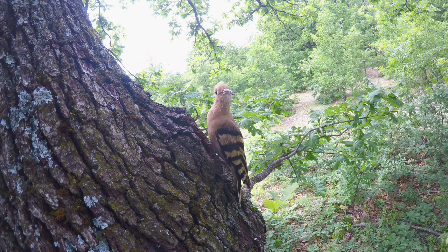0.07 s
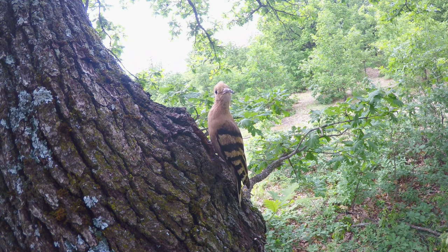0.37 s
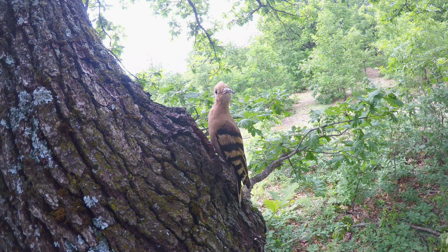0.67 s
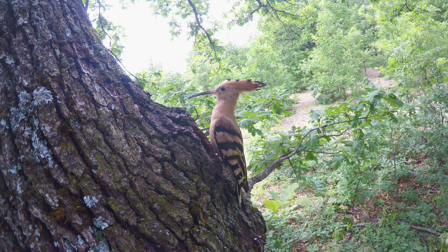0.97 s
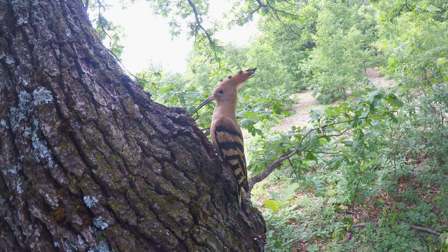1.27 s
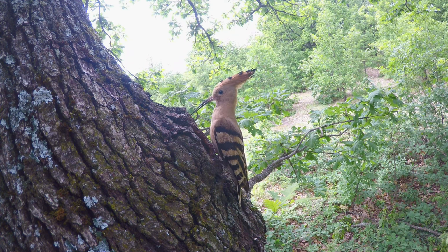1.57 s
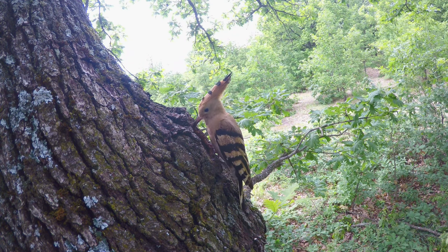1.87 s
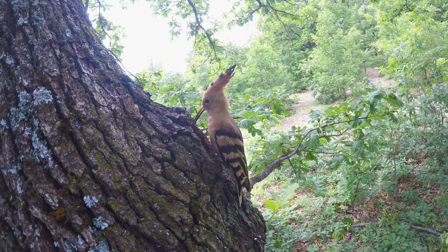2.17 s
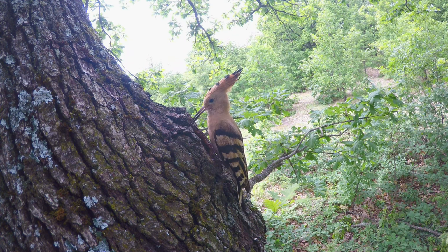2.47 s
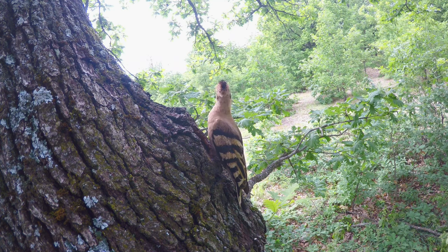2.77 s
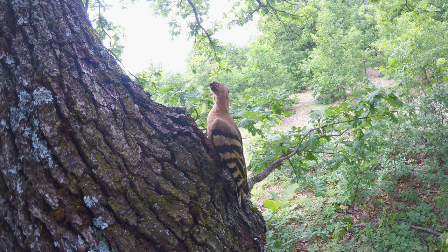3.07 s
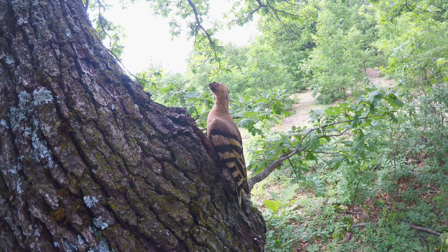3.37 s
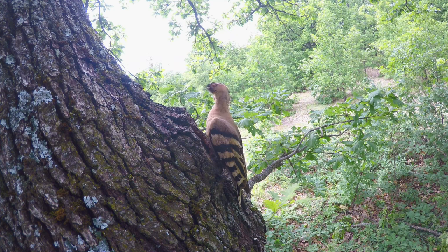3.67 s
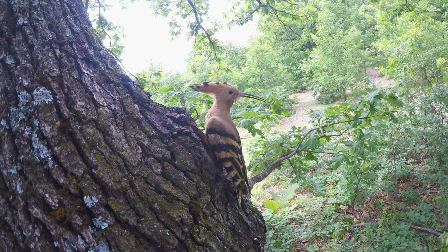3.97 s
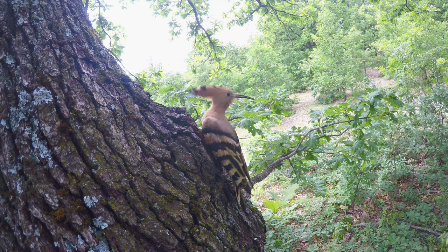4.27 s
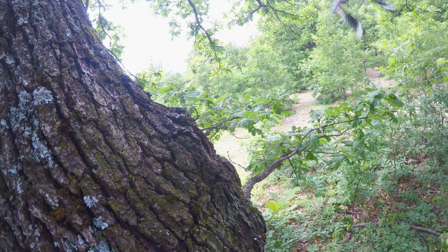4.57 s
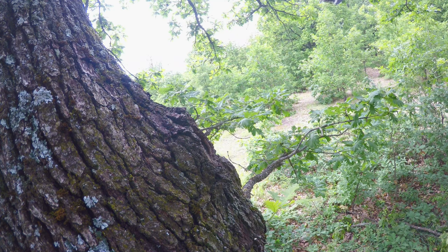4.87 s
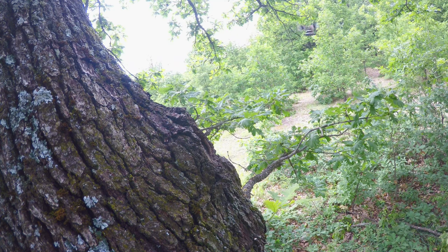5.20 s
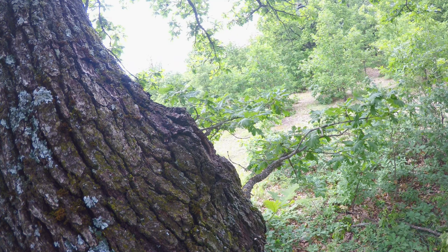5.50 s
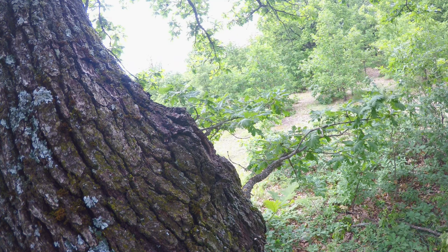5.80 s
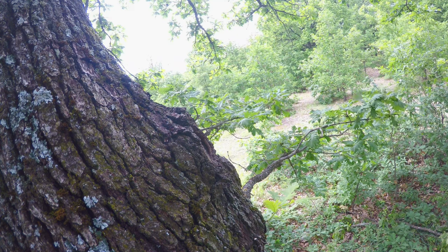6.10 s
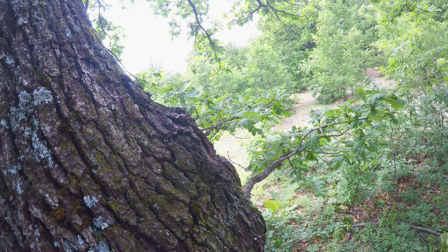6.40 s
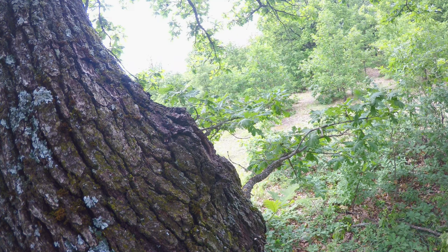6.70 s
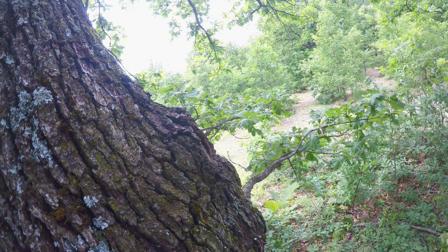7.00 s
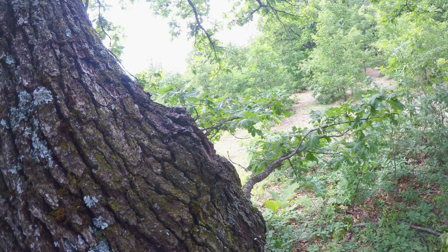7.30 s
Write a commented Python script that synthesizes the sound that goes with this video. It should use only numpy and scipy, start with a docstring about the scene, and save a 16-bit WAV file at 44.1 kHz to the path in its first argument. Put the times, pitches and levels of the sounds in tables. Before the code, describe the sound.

A brood of baby birds trills, peeps and hisses without pause inside a hollow tree, thin and shrill, near the microphone. Over them an adult hoopoe rasps harshly at the start and twice more, then leaves with a light scrape on bark and a short flutter. The chicks carry on alone, with a thin woodland echo and faint steady background noise underneath.

```python
"""A hoopoe at its nest hole in an old tree in a wood. From the start, over faint background noise, the
nestlings beg: very high, fast-wavering whistles over a hiss of air forced through small throats.
The adult rasps until 0.7 s, then from 2.0 s and 3.9 s: its syrinx slaps puffs of noise through throat
and bill. Near 4.4 s it flutters off, scuffing the bark, and a low draught swells.
The brood begs on to the end."""
import sys
import numpy as np
from scipy import signal
from scipy.fft import rfft, irfft
from scipy.io import wavfile

SR = 44100
rng = np.random.default_rng(int(sys.argv[2]) if len(sys.argv) > 2 else 0)


def int16_out(signal):
    """Quantize to a 16-bit WAV file."""
    q = np.round(np.clip(np.atleast_2d(signal).T, -1, 1) * 32767)
    wavfile.write(sys.argv[1], SR, q.astype(np.int16))


N = 328545
TIME = np.arange(N) / SR
FREQS = np.maximum(np.fft.rfftfreq(N, 1 / SR), 1)
SIDES = np.array([[1], [-1]])   # left, right


def from_db(db):
    """Decibels to gain."""
    return 10 ** (np.asarray(db) / 20)


def unit_rms(x):
    """Scale to rms 1."""
    return x / np.sqrt(np.mean(x ** 2) + 1e-20)


def in_time(rows):
    """Columns of a time table at every sample."""
    times, *columns = np.transpose(rows)
    return [np.interp(TIME, times, c) for c in columns]


def at_hz(rows, hz):
    """Columns of a frequency table at hz."""
    f, *columns = np.transpose(rows)
    return [np.interp(np.log(hz), np.log(f), c) for c in columns]


def drift(rate_hz):
    """Smooth random wander, rms 1."""
    return unit_rms(irfft(rfft(rng.standard_normal(N)) / (1 + (FREQS / rate_hz) ** 2), N))


def colour(x, spectrum, skirt_db_per_oct=70):
    """Shape by a spectrum with steep skirts; rms 1."""
    octaves_out = np.abs(np.log2(FREQS / np.clip(FREQS, spectrum[0][0], spectrum[-1][0])))
    gain = from_db(at_hz(spectrum, FREQS)[0] - skirt_db_per_oct * octaves_out)
    return unit_rms(irfft(rfft(x) * gain, N))


def noise(spectrum):
    """Two independent coloured noises."""
    return colour(rng.standard_normal((2, N)), spectrum)


def place(pair, image):
    """Mix a direct and a scattered signal to stereo with level and phase differences."""
    balance_db, lead_rad, coherence = at_hz(image, FREQS)
    coherence = np.clip(coherence, 0, 1)
    direct, scattered = rfft(pair)
    gain = from_db(SIDES * balance_db / 2)
    gain = gain / np.sqrt(np.sum(gain ** 2, axis=0)) * np.exp(.5j * SIDES * lead_rad)
    return irfft(gain * (np.sqrt(1 + coherence) * direct + SIDES * np.sqrt(1 - coherence) * scattered), N)


def scatter(x, t60_s):
    """Dense decaying reflections of unit energy."""
    t = TIME[:int(t60_s * SR) + 2]
    tail = rng.standard_normal(len(t)) * from_db(-60 * t / t60_s)
    return signal.fftconvolve(x, tail / np.linalg.norm(tail))[:N]


def fade(t, fade_s):
    """Linear fade in and out."""
    return np.clip(np.minimum(t - t[0], t[-1] - t) / fade_s, 0, 1)


def bump(centre_s, width_s):
    """Gaussian envelope, peak 1."""
    return np.exp(-.5 * ((TIME - centre_s) / width_s) ** 2)


# Steady background noise: f/Hz, level/dB
FLOOR_SPECTRUM = [(70, -24), (110, -19), (140, -2), (165, 2), (200, -2), (300, -3.5), (420, -7.5),
                  (600, -8), (850, -10), (1200, -13.5), (2200, -17), (3200, -21), (4400, -24)]
# Its stereo image, microphone hiss out of phase at about 500-2000 Hz:
# f/Hz, left-right/dB, left lead/rad, coherence/0-1
FLOOR_IMAGE = [(100, 0, 0, .6), (200, -1, 0, .25), (350, 0, 3.1, .15), (850, 0, 3.1, .88),
               (1500, 0, 3.1, .5), (2300, 0, 1.5, .2), (3000, 0, 0, .55), (3800, 0, 0, .95)]
# Draught envelope: t/s, level/dB
DRAUGHT_LEVEL = [(0, -74), (4.1, -74), (4.55, -60), (5.2, -60), (5.8, -66), (7.45, -72)]
# Draught rumble: f/Hz, level/dB
DRAUGHT_SPECTRUM = [(15, -18), (32, 7), (55, 1), (90, -9), (160, -31), (300, -40)]
# Leaf hiss: f/Hz, level/dB
LEAF_SPECTRUM = [(3500, -67), (4800, 6), (7000, 3), (10000, 0), (15000, -15)]
def background(floor_db=-47.5, leaves_db=-58, wander_db=.8, wander_hz=7,
               gust_db=2.0, gust_hz=7.1, width=0.31):
    """Faint steady noise with microphone hiss, slow air stirring close by and faint leaf hiss."""
    wander = from_db(wander_db * np.array([drift(wander_hz), drift(wander_hz)]))
    floor = from_db(floor_db) * place(noise(FLOOR_SPECTRUM) * wander, FLOOR_IMAGE)
    air, air_side = noise(DRAUGHT_SPECTRUM)
    draught_db = in_time(DRAUGHT_LEVEL)[0] + gust_db * drift(gust_hz)
    draught = from_db(draught_db) * (air + width * SIDES * air_side)
    return floor + draught + from_db(leaves_db) * noise(LEAF_SPECTRUM)


# Adult calls: start t/s, slackening t/s, end t/s, level/dB, brightness/dB, sag/(dB/s), pulse rate/Hz,
# relative rate spread at start, at end
RASP_CALLS = [(-0.3, 0.24, 0.70, -36.5, 3, 25, 142, .07, .12),
              (2.025, 2.48, 3.18, -35.5, 0, 18, 160, .19, .03),
              (3.88, 4.12, 4.425, -37, 3.5, 20, 167, .14, .14)]
def rasp_effort(opening_db=7, opening_s=.05, closing_db=11, closing_s=.023, attack_s=.03, release_s=.045,
                level_share=0.057, rate_share=0.081, shake_db=0.5, falter_db=4.5, slowest_hz=122):
    """Effort builds, holds and slackens in each rasp; gain, brightness and pulse rate follow."""
    gain, bright_db, pulse_hz, spread = np.zeros((4, N))
    unsteady_db = shake_db * drift(20) - falter_db * bump(2.8, .026)   # the long rasp falters once
    for start, slack, end, db, peak_bright_db, sag, rate_hz, spread0, spread1 in RASP_CALLS:
        at = (TIME >= start) & (TIME < end)
        t = TIME[at]
        effort_db = unsteady_db[at] - opening_db * np.exp((start - t) / opening_s)
        effort_db -= sag * np.maximum(t - slack, 0)
        effort_db -= closing_db * np.exp((t - end) / closing_s)
        gate = np.minimum(1, np.minimum((t - start) / attack_s, (end - t) / release_s))
        gain[at] = from_db(db + level_share * effort_db) * gate
        bright_db[at] = peak_bright_db + effort_db
        pulse_hz[at] = rate_hz * from_db(rate_share * effort_db)
        spread[at] = np.interp(t, [start, end], [spread0, spread1])
    return gain, bright_db, np.maximum(pulse_hz, slowest_hz), spread


# Bill resonance: t/s, f/Hz, boost/dB
BILL_RESONANCE = [(.26, 1820, 6.5), (.34, 1980, -3.5), (.55, 2300, 8.5), (2.05, 2180, 2.5),
                  (2.28, 1940, 11.5), (2.55, 2090, 7.5), (2.9, 2440, 12.5), (3.88, 2030, 0),
                  (4.03, 1800, 6), (4.32, 2200, 2.5)]
def bill(x, width_hz=300):
    """The open bill's resonance, rising as it narrows."""
    hz, boost_db = in_time(BILL_RESONANCE)
    carrier = np.exp(2j * np.pi * np.cumsum(hz) / SR)
    pole = np.exp(-np.pi * width_hz / SR)
    band = 2 * np.real(carrier * signal.lfilter([1 - pole], [1, -pole], x / carrier))
    return x + (from_db(boost_db) - 1) * band


# Adult throat: f/Hz, level/dB
THROAT_SPECTRUM = [(300, -10), (560, -6.5), (800, 0.5), (990, -4), (1190, 0.5), (1400, -9), (1780, -0.5),
                   (2200, -3.5), (2520, -1), (2700, 2), (3060, 3.5), (3300, -0.5), (3500, -1), (3800, -1.5),
                   (4300, -12.5), (4600, -12.5)]
# Band response to brightness: f/Hz, slope/(dB/dB)
BRIGHTNESS_BANDS = [(900, 0.24), (1900, 0.98), (3000, 1.72), (3900, 1.75)]
# Adult's stereo image: f/Hz, left-right/dB, left lead/rad, coherence/0-1
RASP_IMAGE = [(300, -2, .2, .4), (550, -5.5, .1, .55), (800, -6, 1.3, .8), (1050, 2, 1.8, .85),
              (1300, 4.5, 2.0, .75), (1550, 3, 0, .7), (1900, 2, .1, .93), (2400, 0, 0, .99)]
def rasps(puff_s=0.00085, leak=0.32, snap=1.4, uneven_db=-1.0, neutral_bright_db=3.5, level_db=5.0):
    """The adult's syrinx slaps about 150 times a second, each slap letting a noise puff into the throat."""
    gain, bright_db, pulse_hz, spread = rasp_effort()
    cycles = np.cumsum(pulse_hz * np.exp(2 * spread * drift(120))) / SR
    slaps = np.diff(np.floor(cycles), prepend=0) * from_db(uneven_db * rng.standard_normal(N))
    opening = signal.lfilter([1], [1, -np.exp(-1 / (puff_s * SR))], slaps)
    puffs = (opening + leak) * rng.standard_normal((2, N))
    clicks = snap * slaps * [[1], [0]]   # direct path only
    spectrum = rfft(colour(puffs + clicks, THROAT_SPECTRUM))
    centres_hz, slopes = np.transpose(BRIGHTNESS_BANDS)
    voice = 0
    for weights, slope in zip(np.eye(len(centres_hz)), slopes):   # the top sinks first as effort falls
        band = irfft(spectrum * np.interp(FREQS, centres_hz, weights), N)
        voice += band * from_db(slope * (bright_db - neutral_bright_db))
    return place(bill(voice) * gain * from_db(level_db), RASP_IMAGE)


RISE_HZ_PER_S2, DIVE_HZ_PER_S2 = 5.0e6, 1.9e6
def arch_hz(t, first, last):
    """Pitch drop below the crest: rise before `first`, dive after `last`."""
    return RISE_HZ_PER_S2 * np.minimum(t - first, 0) ** 2 + DIVE_HZ_PER_S2 * np.maximum(t - last, 0) ** 2


def call_span(first, last, first_hz, last_hz, rise_foot_hz=4200, dive_foot_hz=(4300, 5600)):
    """Samples and times of a nestling call, foot of rise to foot of dive."""
    start = first - np.sqrt(max(first_hz - rise_foot_hz, 1) / RISE_HZ_PER_S2)
    end = last + np.sqrt(max(last_hz - rng.uniform(*dive_foot_hz), 1) / DIVE_HZ_PER_S2)
    at = np.flatnonzero((TIME >= start) & (TIME < end))
    return at, TIME[at]


# Begging phrases: first, last crest t/s; wave count; relative slowing; start, middle, end crest f/Hz;
# start, end swing/Hz; rise, trill, dive level/dB; hoarseness/0-1; hiss, sizzle level/dB
TRILL_PHRASES = [(-0.021, 0.095, 2, 0.0069, 13500, 13300, 12800, 1970, 1330, -53, -35.5, -48, 0.65, -39.5, -45),
                 (0.204, 0.8, 9, 0.02, 12120, 14100, 12930, 1690, 3060, -32, -36, -29.5, 0.4, -37, -43),
                 (0.228, 0.589, 6, -0.074, 11340, 10800, 10270, 1650, 290, -45, -40.5, -50, 0.4, -50, -48),
                 (0.693, 1.164, 7, -0.035, 12500, 12100, 12100, 620, 986, -54, -38.5, -35, 0.45, -44, -54),
                 (0.972, 1.129, 2, -0.13, 10220, 10160, 10200, 430, 530, -42, -37.5, -33.5, 0.6, -43, -45),
                 (1.026, 1.244, 3, 0.13, 11200, 10600, 10430, 967, 1240, -37, -42, -57, 0.5, -39, -43),
                 (1.304, 1.576, 4, -0.0055, 11290, 12260, 10360, 2070, 4280, -55, -35.5, -38, 0.4, -40.5, -42),
                 (1.381, 1.684, 5, 0.0072, 12000, 12200, 9380, 531, 1540, -39.5, -31.5, -29.5, 0.1, -45, -47),
                 (1.827, 2.069, 4, 0.079, 10950, 11300, 10800, 193, 970, -48, -44, -32, 0.4, -37.5, -38.5),
                 (1.933, 2.345, 6, -0.12, 13100, 13700, 14030, 2670, 2240, -42, -37, -28, 0.73, -39, -48),
                 (2.224, 2.577, 6, 0.01, 10560, 10200, 9600, 1184, 1350, -52, -41, -37, 0.8, -43.5, -43.5),
                 (2.579, 3.032, 7, 0.047, 10000, 14800, 12670, 1120, 3150, -40, -40, -30.5, 0.8, -35, -42),
                 (2.73, 3.022, 5, 0.054, 9930, 9260, 9000, 890, 1280, -40, -38, -30, 0.6, -47, -41),
                 (3.242, 3.618, 6, 0.066, 9540, 10240, 9500, 1025, 2110, -45, -39.5, -34, 0, -43.5, -62),
                 (3.276, 3.748, 7, -0.022, 8230, 13860, 12600, 1260, 3330, -38, -41, -30, 0.8, -35.5, -42),
                 (3.841, 4.193, 6, -0.012, 10200, 10600, 10740, 425, 917, -45, -38, -34, 0.65, -46, -46.5),
                 (3.958, 4.376, 6, -0.047, 11700, 12450, 12000, 1340, 3450, -40, -40, -45, 0.3, -37.5, -41.5),
                 (4.331, 4.485, 2, -0.14, 9880, 9780, 10530, 2180, 955, -53, -36, -33.5, 0.9, -42.5, -41.5),
                 (4.54, 4.872, 5, -0.013, 10650, 12240, 11740, 920, 2630, -43, -36, -29, 0.7, -43, -43),
                 (4.597, 4.959, 5, -0.13, 10120, 10330, 10490, 3350, 1960, -36, -33, -37, 0.67, -34, -45),
                 (5.038, 5.397, 5, -0.18, 11030, 11150, 10740, 710, 940, -36, -35, -38, 0.45, -48, -49),
                 (5.101, 5.181, 1, 0.0043, 10400, 9560, 9500, 624, 650, -36.5, -41, -38, 0.6, -45, -54),
                 (5.195, 5.388, 3, 0.11, 9300, 10100, 10000, 3110, 2950, -28.5, -33.5, -30.5, 0.86, -36, -38.5),
                 (5.428, 5.514, 1, 0.029, 7840, 7870, 7670, 2260, 2270, -50, -49, -51, 0.1, -37.5, -47),
                 (5.576, 5.824, 4, -0.12, 11000, 12000, 10500, 1350, 1250, -36, -28.5, -43, 0, -51, -46),
                 (5.577, 5.883, 5, 0.028, 10730, 10500, 10130, 170.5, 556, -42, -32, -34, 0.1, -39, -53),
                 (5.615, 5.775, 2, 0.084, 8950, 9600, 9200, 1493, 2990, -35, -36.5, -35, 0.3, -61, -47),
                 (5.848, 5.927, 1, 0.2, 9350, 9320, 9630, 3060, 2680, -39, -34, -30, 0.7, -42, -44),
                 (6.035, 6.196, 2, -0.029, 8330, 8710, 8780, 2935, 3390, -44, -41, -34.5, 0, -37.5, -40),
                 (6.071, 6.395, 5, -0.33, 10240, 10470, 10450, 264, 920, -31, -31, -29, 0, -48, -58),
                 (6.266, 6.341, 1, -0.019, 9320, 8900, 9200, 2450, 2440, -31, -42.5, -39, 0.6, -53, -44),
                 (6.416, 6.758, 5, 0.15, 7600, 9030, 8800, 1364, 2715, -53, -42.5, -31.5, 1, -44, -61),
                 (6.447, 6.774, 4, -0.011, 10320, 11600, 12300, 5080, 6940, -34, -36, -32, 0.8, -40.5, -47),
                 (6.827, 6.982, 2, 0.2, 9320, 11280, 9430, 2715, 4970, -40, -32.5, -29, 0.7, -45, -56),
                 (7.264, 7.399, 2, 0.18, 8960, 10220, 9860, 3840, 1920, -44, -39.5, -29.5, 0.85, -44, -65)]
def trills(lean=0.12, hook=.3, trough_db=1.0):
    """Nestling calls: quick rise, trill under a curved crest line, dive."""
    for (first, last, waves, slowing, hz0, hz1, hz2, swing0, swing1,
         rise_db, trill_db, dive_db, hoarse, hiss_db, sizzle_db) in TRILL_PHRASES:
        at, t = call_span(first, last, hz0, hz2)
        along = np.clip((t - first) / (last - first), 0, 1)
        turn = np.pi * round(waves) * (along + slowing * along * (1 - along))
        turn -= lean * np.sin(turn) ** 2   # falls slower than it rises
        crest_hz = np.polyval(np.polyfit([0, .5, 1], [hz0, hz1, hz2], 2), along)
        dip = (1 - hook) * np.sin(turn) ** 2 + hook * (1 - np.abs(np.cos(turn)))   # hook sharpens troughs
        pitch_hz = crest_hz - (swing0 + (swing1 - swing0) * along) * dip - arch_hz(t, first, last)
        knots_s = [(t[0] + first) / 2, first, last, (last + t[-1]) / 2]
        db = np.interp(t, knots_s, [rise_db, trill_db, trill_db, dive_db])
        # troughs and falling strokes are louder, the strokes most in high trills
        stroke_db = np.interp(crest_hz, [10500, 13500], [.5, 3.5])
        db += stroke_db * np.sin(2 * turn) - trough_db * np.cos(2 * turn)
        yield at, pitch_hz, db, hoarse, hiss_db, sizzle_db


# Chirp crests: t/s, f/Hz, level/dB
CHIRP_CRESTS = [(0.002, 10070, -35), (1.443, 9800, -50), (1.729, 8250, -33), (3.284, 8640, -32.5),
                (4.265, 8530, -36.5), (4.378, 10240, -32.5), (5.936, 9560, -35), (6.343, 9060, -37),
                (6.431, 9500, -31.5), (7.133, 8040, -35.5), (7.251, 8800, -39.5), (7.359, 8860, -39)]
def chirps(hoarse=0.88, rise_rel_db=-25, hiss_rel_db=-5, sizzle_rel_db=-39):
    """Nestling calls: a rise and a louder dive, no trill."""
    for crest_s, hz, db in CHIRP_CRESTS:
        at, t = call_span(crest_s, crest_s, hz, hz)
        pitch_hz = hz - arch_hz(t, crest_s, crest_s)
        onset_db = np.interp(t, [t[0], (crest_s + t[-1]) / 2], [rise_rel_db, 0])
        yield at, pitch_hz, db + onset_db, hoarse, db + hiss_rel_db, db + sizzle_rel_db


# Peep centres: t/s, f/Hz, glide/(Hz/s), level/dB
PEEP_STROKES = [(0.043, 6900, -110e3, -40), (0.138, 7340, -110e3, -31), (0.630, 6700, -140e3, -30),
                (0.859, 7000, -130e3, -27.5), (0.996, 6900, 170e3, -33), (1.544, 7230, -90e3, -31),
                (1.620, 7060, -110e3, -31), (1.726, 5930, -170e3, -37), (1.752, 7300, -70e3, -31),
                (1.826, 6700, 200e3, -41), (1.975, 7200, -100e3, -32), (2.123, 7100, -130e3, -25),
                (2.538, 7150, 120e3, -33.5), (2.692, 6600, 120e3, -30.5), (3.214, 6900, 190e3, -33.5),
                (3.254, 6900, 170e3, -27), (3.310, 6870, -78e3, -25), (3.930, 6500, 190e3, -31.5),
                (4.420, 6370, -170e3, -24.5), (4.570, 6580, 220e3, -26.5), (4.898, 7350, -110e3, -30),
                (4.929, 7080, -100e3, -27), (5.002, 6300, -130e3, -28), (5.307, 7000, -130e3, -35),
                (5.441, 6850, -110e3, -21.5), (5.622, 7000, -110e3, -26), (5.663, 7260, -40e3, -30.5),
                (5.831, 6400, 170e3, -31.5), (5.922, 6600, -110e3, -22.5), (6.045, 6700, 160e3, -31),
                (6.067, 6230, -100e3, -27), (6.278, 7170, -90e3, -31), (6.368, 7400, -110e3, -30),
                (6.464, 7600, -100e3, -27), (6.560, 7100, -180e3, -27), (6.599, 6620, 230e3, -28),
                (6.961, 7200, 170e3, -34), (7.055, 7100, -190e3, -42), (7.118, 6660, 213e3, -33.5),
                (7.154, 6630, -90e3, -30.5), (7.176, 4400, -90e3, -43), (7.226, 5850, 170e3, -34),
                (7.254, 6670, 170e3, -32), (7.296, 5700, -120e3, -36), (7.440, 7030, -80e3, -27)]
def peeps(length_s=.03, fade_db_per_s=1300, hoarse=0.36, hiss_rel_db=-20, sizzle_rel_db=-43):
    """Nestling calls: single flaring strokes, most through the hole's main resonance."""
    for centre_s, hz, glide_hz_per_s, db in PEEP_STROKES:
        at = np.flatnonzero(np.abs(TIME - centre_s) < length_s / 2)
        t = TIME[at] - centre_s
        pitch_hz = hz + glide_hz_per_s * t
        yield at, pitch_hz, db - fade_db_per_s * np.abs(t), hoarse, db + hiss_rel_db, db + sizzle_rel_db


# Swoop troughs: t/s, f/Hz, level/dB
SWOOP_TROUGHS = [(1.476, 7310, -30.5), (5.237, 5300, -36), (5.318, 6400, -38), (5.388, 5650, -37),
                 (5.470, 5700, -33.5), (5.550, 5750, -30.5), (6.075, 5650, -34), (6.160, 5550, -31.5),
                 (6.402, 4450, -45), (6.493, 5400, -35), (6.571, 5600, -31), (6.654, 5700, -33),
                 (6.741, 5550, -31), (7.040, 4150, -51), (7.307, 4150, -44), (7.38, 6360, -31.5)]
def swoops(fall_s=.036, crest_hz=9500, fade_db=-8, hoarse=0.66, hiss_rel_db=-19, sizzle_rel_db=-31):
    """Nestling calls: a fall that hooks upward again."""
    for trough_s, hz, db in SWOOP_TROUGHS:
        at = np.flatnonzero((TIME > trough_s - fall_s) & (TIME < trough_s + fall_s / 2))
        along = (TIME[at] - trough_s) / fall_s
        pitch_hz = hz + (crest_hz - hz) * np.sin(np.pi / 2 * along) ** 2
        yield at, pitch_hz, db + fade_db * np.abs(along), hoarse, db + hiss_rel_db, db + sizzle_rel_db


def delayed_scatter(x, t60_s, lag_s=.004):
    """Slightly delayed diffuse copy that widens the nestlings' sound in stereo."""
    return np.pad(scatter(x, t60_s), (int(lag_s * SR), 0))[:N]


# Nest hole resonances: f/Hz, level/dB
HOLE_RESPONSE = [(4200, 3), (4950, -4), (5550, -3), (5900, -0.5), (6500, -1), (7200, 0), (7600, -0.5),
                 (7850, -4), (8400, -10), (9000, -2.5), (9600, -12.5), (10200, -8), (10950, -15),
                 (11950, -9), (13200, -15.5), (14000, -7), (15000, -17)]
# Brood's stereo image: f/Hz, left-right/dB, left lead/rad, coherence/0-1
BROOD_IMAGE = [(4500, 0, 0, .5), (5600, 5, -.4, .75), (6200, -1, -.3, .88), (7200, -1.5, .5, .8),
               (8100, -7, -1.7, .45), (9000, -1, .3, .7), (9700, -4, -2.3, .3), (10200, -10, -.6, .3),
               (11500, -4, .8, .5), (13500, -4, 0, .15)]
def whistles(calls, waver=0.0081, waver_hz=19, jitter_depth=0.0032, flutter_db=3.5, squeal_db=-3,
             low_db_per_oct=24, top_db_per_oct=-0.5, hollow_t60_s=0.005, hollow_db=-10, level_db=-1.5):
    """Each nestling's whistle and its band of squealing air flare on crossing the hole's resonances."""
    out = np.zeros(N)
    jitter, flutter, air = drift(500), drift(102), drift(600)
    for at, pitch_hz, call_db, hoarse, _, _ in calls:
        t = TIME[at]
        own = (at + rng.integers(N)) % N   # each call's own stretch of noise
        pitch_hz = pitch_hz * (1 + waver * np.sin(2 * np.pi * waver_hz * t + rng.uniform(0, 2 * np.pi)))
        db = call_db + at_hz(HOLE_RESPONSE, pitch_hz)[0] + flutter_db * flutter[own]
        db += low_db_per_oct * np.minimum(np.log2(pitch_hz / 5500), 0)
        db += top_db_per_oct * np.clip(np.log2(pitch_hz / 9000), 0, 1)
        phase = 2 * np.pi * np.cumsum(pitch_hz * (1 + jitter_depth * jitter[own])) / SR
        squeal = from_db(squeal_db) * hoarse * (pitch_hz / 8000) ** 1.6 * air[own]   # higher is hoarser
        whistle = np.sin(phase) + squeal * np.cos(phase)
        out[at] += np.sqrt(2) * fade(t, fade_s=0.0086) * from_db(db) * whistle
    direct = out + from_db(hollow_db) * scatter(out, hollow_t60_s)
    return from_db(level_db) * place([direct, delayed_scatter(out, hollow_t60_s)], BROOD_IMAGE)


def deep_nestlings(trill_hz=14, depth=0.14, hoarse=0.019, flicker_db=9.0, flicker_hz=14, count=5):
    """Hoarser nestlings deeper in the hollow trill at their own pitches; rms 1."""
    out = 0
    for centre_hz in np.geomspace(9800, 13400, count):
        turn = 2 * np.pi * np.cumsum(trill_hz * (1 + .2 * drift(6.9))) / SR
        swing = np.sin(turn + 0.3 * np.sin(turn)) * (1 + .3 * drift(7))   # quick rise, slower fall
        pitch_hz = centre_hz * np.exp(depth * swing + 0.056 * drift(3.5) + hoarse * drift(509))
        out += np.sin(2 * np.pi * np.cumsum(pitch_hz) / SR) * from_db(flicker_db * drift(flicker_hz))
    return unit_rms(np.array([out, delayed_scatter(out, t60_s=0.021)]))


# Hiss leaving the hole: f/Hz, level/dB
HISS_SPECTRUM = [(4300, -21.5), (5000, -12), (5500, -9), (5850, 1.5), (6120, 7.5), (6450, 3), (6620, 4),
                 (6850, 5.5), (7250, 5.5), (7550, -4.5), (7800, 0), (8300, -6), (8600, -31)]
# Sizzle above it: f/Hz, level/dB
SIZZLE_SPECTRUM = [(4880, -10), (8400, -11), (8950, 11), (9250, 6), (9550, 8), (9950, 10), (10300, 6.5),
                   (10900, 3), (11800, 8.5), (12500, 6), (13300, 2.5), (13950, 5.5), (14600, -13),
                   (15500, -19)]
# Gaps in the brood's background wheeze: start t/s, end t/s
BROOD_LULLS = [(3.085, 3.25), (7.04, 7.125)]
def wheeze(calls, brood_hiss_db=-51, brood_sizzle_db=-54, hiss_gain_db=-2.0, sizzle_gain_db=-4.0,
           swell_db=2.5, fade_s=0.012, pump_db_per_hz=-0.0014, pump_range_hz=2030,
           grain_db=1.1, grain_hz=100, voiced=0.58):
    """Air forced through small throats hisses with each call, over the brood's soft half-voiced wheeze."""
    lulls = sum(np.clip(np.minimum(TIME - start, end - TIME) / fade_s, 0, 1) for start, end in BROOD_LULLS)
    power = ((1 - lulls) * from_db([[brood_hiss_db], [brood_sizzle_db]])) ** 2
    for at, pitch_hz, _, _, hiss_db, sizzle_db in calls:
        # low pitch: less hiss, more sizzle
        pump_db = pump_db_per_hz * np.clip(np.median(pitch_hz) - pitch_hz, -pump_range_hz, pump_range_hz)
        flow = fade(TIME[at], fade_s) * from_db(swell_db * np.linspace(-.5, .5, len(at)))
        gains = from_db([hiss_db + hiss_gain_db + pump_db, sizzle_db + sizzle_gain_db - pump_db])
        power[:, at] += (flow * gains) ** 2
    hiss, sizzle = np.sqrt(power)
    throats = rng.standard_normal((2, N)) + voiced * deep_nestlings()
    air = hiss * colour(throats, HISS_SPECTRUM) + sizzle * colour(throats, SIZZLE_SPECTRUM)
    return place(air * from_db(grain_db * drift(grain_hz)), BROOD_IMAGE)


def bursts(rows, spectrum, width):
    """Bell-shaped bursts of stereo noise."""
    mid, side = noise(spectrum)
    envelope = sum(from_db(db) * bump(centre_s, width_s) for centre_s, db, width_s in rows)
    return envelope * (mid + width * SIDES * side)


# Wingbeats: t/s, level/dB, width/s
WING_STROKES = [(4.368, -47, 0.012), (4.445, -37.5, 0.014), (4.542, -46.5, 0.012), (4.635, -50, 0.015)]
# Air pushed by a wing: f/Hz, level/dB
WING_SPECTRUM = [(40, -29), (105, -21), (165, -1.5), (260, -12), (450, -14.5), (800, -22), (1300, -31),
                 (5000, -39)]
# Scuffs on bark: t/s, level/dB, width/s
BARK_SCUFFS = [(4.372, -43, 0.01), (4.398, -46, 0.0086)]
# Brushed bark: f/Hz, level/dB
BARK_SPECTRUM = [(1500, -20), (3000, -4), (5000, 15), (8000, 2), (14000, -3)]
def take_off():
    """Wings push soft puffs of air; claws and feathers brush the bark."""
    return bursts(WING_STROKES, WING_SPECTRUM, width=0.3) + bursts(BARK_SCUFFS, BARK_SPECTRUM, width=0.27)


def scene(wood_t60_s=0.55, wood_db=-25):
    """Birds close by, a thin echo from the trees, background noise underneath."""
    # each call: samples, f/Hz, whistle level/dB, hoarseness/0-1, hiss level/dB, sizzle level/dB
    calls = [*trills(), *swoops(), *peeps(), *chirps()]
    birds = whistles(calls) + wheeze(calls) + rasps()
    echo = np.array([scatter(side, wood_t60_s) for side in birds])
    return birds + from_db(wood_db) * echo + take_off() + background()


def record(dry):
    """Steep low-pass at 15.3 kHz."""
    return signal.sosfilt(signal.ellip(12, .1, 90, 15300, fs=SR, output="sos"), dry)


dry = scene()
out = record(dry)
int16_out(out)
```